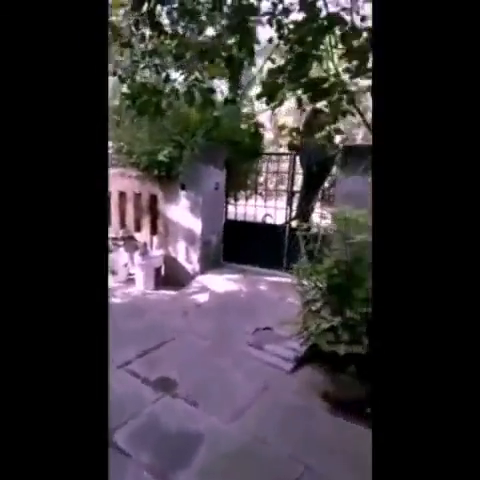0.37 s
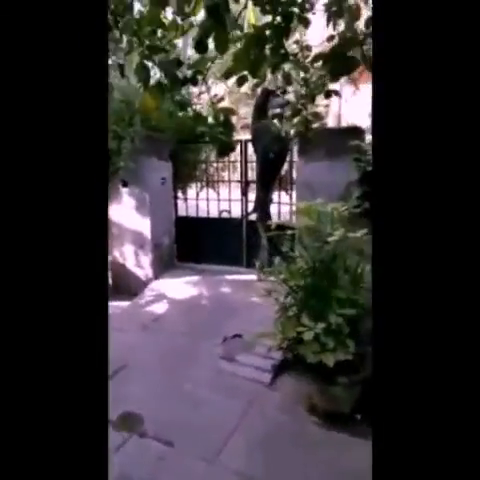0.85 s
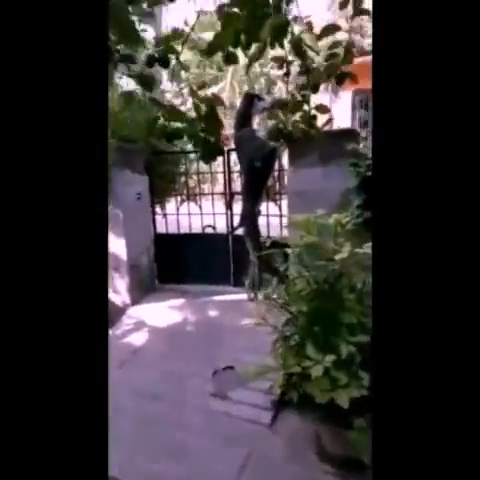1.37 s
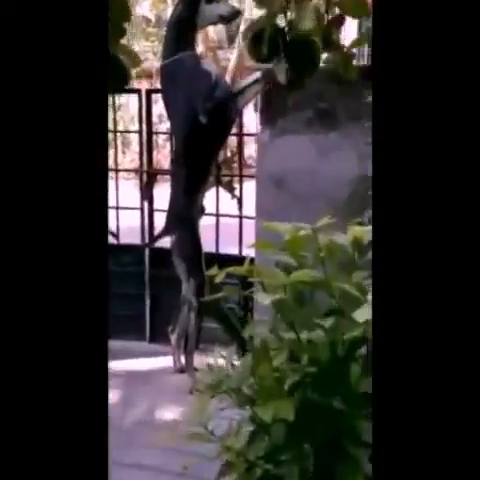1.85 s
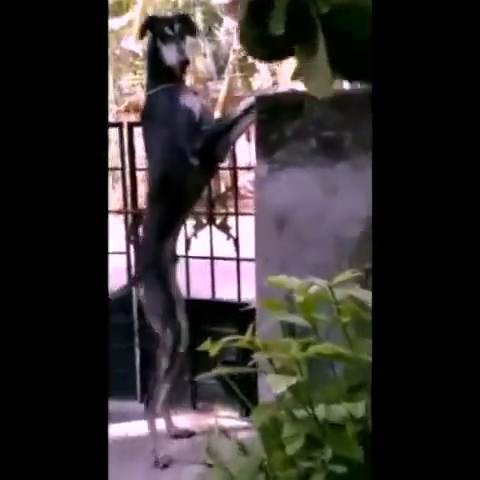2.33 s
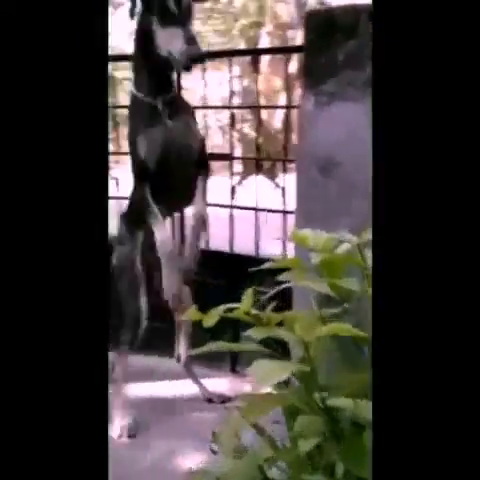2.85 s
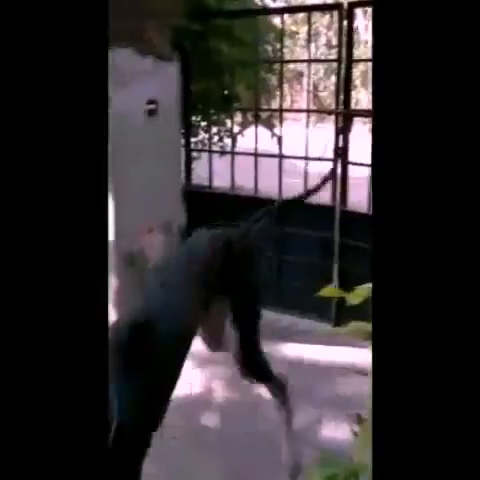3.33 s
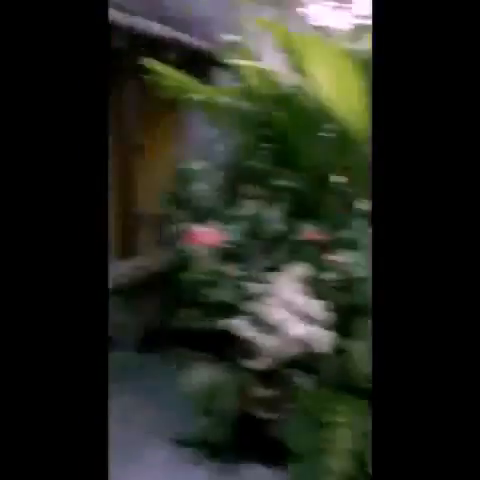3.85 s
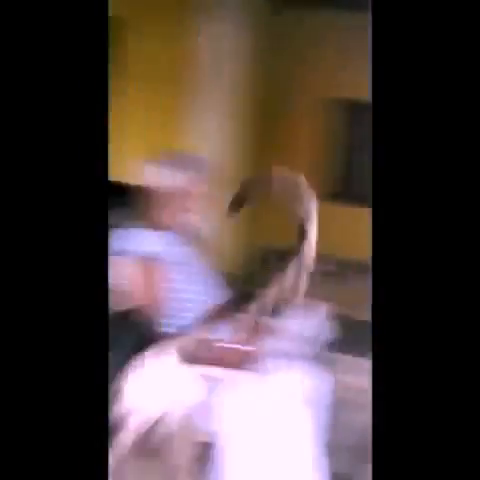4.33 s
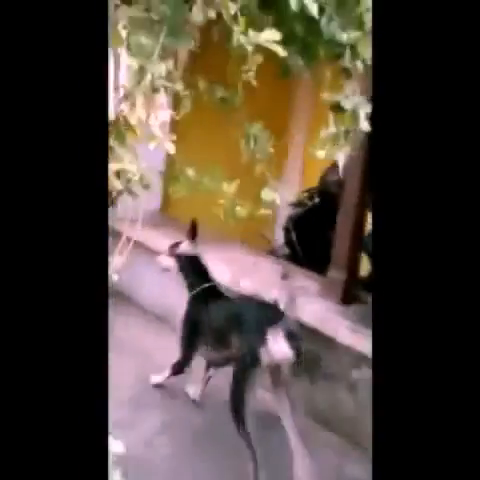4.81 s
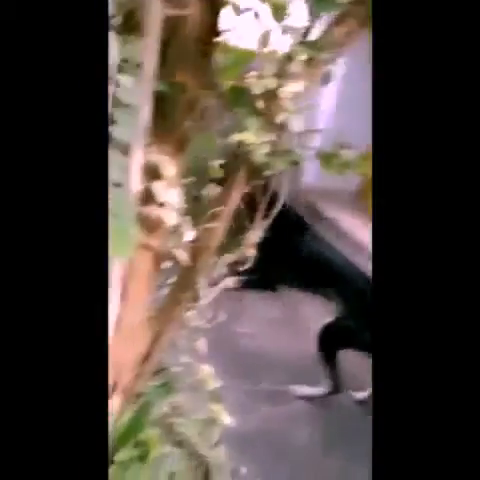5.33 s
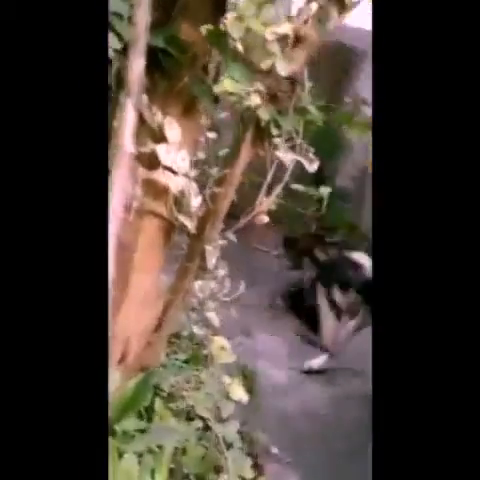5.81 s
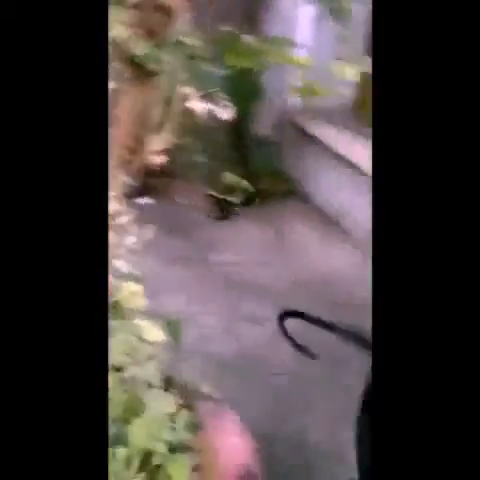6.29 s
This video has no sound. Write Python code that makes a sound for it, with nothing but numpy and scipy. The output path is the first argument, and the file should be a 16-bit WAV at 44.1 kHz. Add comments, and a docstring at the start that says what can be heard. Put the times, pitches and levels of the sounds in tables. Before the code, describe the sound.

In a leafy walled garden, a small bird whistles downward, crows caw, then a dog scampers past with jingling collar bell and scuffing paws.

```python
"""A walled garden in open air, with a low vehicle rumble beyond the wall that comes and goes.
A dog runs round a walking phone: claws tick, paws and soles scuff in grainy noise. A small bird near by
slides its whistle down four times, far birds peep in short near-sine notes, and crows caw three times in
rasping pulses; the collar bell jingles in ringing modes from just before the last caw.
The phone's noise suppressor turns quiet moments down throughout."""
import sys
import numpy as np
from scipy import signal
from scipy.fft import rfft, irfft
from scipy.io import wavfile
from scipy.ndimage import uniform_filter1d

SR = 44100
rng = np.random.default_rng(int(sys.argv[2]) if len(sys.argv) > 2 else 0)


def nominal_scale(level):
    """Amplitude ratio for a level in decibels (scalar or array-like)."""
    x = np.asarray(level, float) / 20
    return 10 ** x


def waveform_to_disk(signal):
    """Save audio, clipped to [-1, 1], as 16-bit WAV at the path in sys.argv[1]."""
    frames = np.transpose(np.atleast_2d(signal))
    scaled = np.clip(frames, -1, 1) * 32767
    samples = np.round(scaled).astype(np.int16)
    wavfile.write(sys.argv[1], SR, samples)


N = 294147

# the two microphone ports:
# (frequency [Hz], likeness [0-1], phase lead of the left [rad], left-right level of the air [dB])
PORTS = [(60, 0.4, 0.5, -22), (200, 0.77, 0, 8.5), (682, 0.85, 0.65, -3.5), (1068, 0.76, -2.5, 1),
         (3596, 0.68, -2.5, -0.5), (6140, 0.17, -0.05, 0), (11800, 0, -2, 18)]
# left-right level of the feet; scuffs scale it by frequency: (time [s], left-right level [dB])
FEET_SIDE = [(0.0, 13), (0.2, 35), (0.59, 16), (1.36, 1), (1.65, 25), (1.74, -12), (3.44, 4), (3.9, 29.5),
             (3.98, 8), (4.46, 27), (4.89, 6), (5.94, 4.5), (6.08, 26.5), (6.3, 6), (6.67, 15)]


def evened(x):
    """Scales a sound until its channel mean has rms 1."""
    return x / np.sqrt(np.mean(np.atleast_2d(x).mean(0) ** 2) + 1e-20)


def read(points, hz, axis=1):
    """Reads one column of a table over log frequency."""
    table = np.transpose(points)
    return np.interp(np.log(hz + 1), np.log(table[0] + 1), table[axis])


def add(mix, s, sound, pan_db=0):
    """Mixes a sound in at a time, panned by a left-right level difference."""
    part = mix[:, round(s * SR):][:, :np.shape(sound)[-1]]
    sides = nominal_scale(np.array([[.5], [-.5]]) * pan_db)
    part += np.atleast_2d(sound)[:, :part.shape[1]] * sides


def wobble(count, smooth_s):
    """Slow random drift of rms 1: white noise averaged twice."""
    width = int(smooth_s * SR)
    once = uniform_filter1d(rng.standard_normal(count), width)
    return evened(uniform_filter1d(once, width))


def patches(frames, bins_wide, frames_long):
    """Random cloud of deviation 1 over frequency and time, smoothed into patches."""
    cloud = rng.standard_normal((frames, 257)).T
    cloud = uniform_filter1d(uniform_filter1d(cloud, bins_wide, 0), frames_long, 1)
    return cloud / cloud.std()


def ports(x):
    """The right port hears a sound with its own phase at each frequency."""
    hz = np.fft.rfftfreq(x.shape[1], 1 / SR)
    turned = rfft(x[1]) * np.exp(-1j * read(PORTS, hz, axis=2))
    return np.array([x[0], irfft(turned, x.shape[1])])


def echoed(x, direct_db, rise_s, t60, shared):
    """Walls and leaves scatter a sound into a dense swarm of echoes; loudness is kept."""
    t = np.arange(SR // 2) / SR
    swarm = rng.standard_normal((3, len(t))) * (rng.random((3, len(t))) < .06)
    common, *own = swarm
    tail = (shared * common + np.array(own)) * (1 - np.exp(-t / rise_s)) * nominal_scale(-60 * t / t60)
    tail /= np.linalg.norm(tail[0])
    tail[:, 0] = nominal_scale(direct_db)  # the direct sound, against a swarm of unit energy
    wet = ports(signal.fftconvolve(x, tail, axes=1)[:, :N])
    return evened(wet) * np.sqrt(np.mean(x.mean(0) ** 2))


def noise(field_db, alike, grains=1):
    """White noise, smooth or in grains, coloured over frequency and time and heard by both ports."""
    white = grains * rng.standard_normal((2, N + 512))
    left, other = signal.stft(white, nperseg=512, noverlap=384)[2][:, :, :field_db.shape[2]]
    hz = np.fft.rfftfreq(512, 1 / SR)[:, None]
    same = np.clip(alike * read(PORTS, hz), 0, 1)
    right = same * left + np.sqrt(1 - same ** 2) * other
    right = right * np.exp(-1j * read(PORTS, hz, axis=2))
    coloured = np.array([left, right]) * nominal_scale(field_db)
    return signal.istft(coloured, nperseg=512, noverlap=384)[1][:, :N]


def whistle(rows, flutter):
    """A near sine follows rows of (time [s], rms level [dB], pitch [Hz]), its pitch fluttering."""
    s, db, hz = np.transpose(rows)
    t = np.arange(s[0], s[-1], 1 / SR)
    pitch = np.interp(t, s, hz) * (1 + flutter * wobble(len(t), 0.00064))
    tone = np.sin(2 * np.pi * np.cumsum(pitch) / SR)
    level = np.sqrt(2) * nominal_scale(np.interp(t, s, db))
    return level * tone * signal.windows.tukey(len(t), .15)


def air():
    """An open-air wash, broken into narrow patches as by a noise suppressor, over a low noise rumble."""
    # far traffic, leaves, insects: (frequency [Hz], relative density [dB per Hz])
    air_colour = [(59, -29), (100, -9.5), (524, -17), (621, -13.5), (722, -27), (808, -12.5), (1130, -22.5),
                  (1480, -17.5), (3710, -24.5), (7320, -22.5), (9000, -45.5), (11700, -47), (19800, -120)]
    # the wash: (time [s], rms level [dB])
    wash_level = [(0, -56), (2, -56), (4.7, -54), (6.67, -53.5)]
    # a vehicle beyond the wall: (time [s], rms level [dB])
    rumble_level = [(0.0, -80.5), (0.72, -89), (2.01, -120), (2.17, -56), (3.07, -55.5), (3.49, -48.5),
                    (3.92, -65), (5.61, -58), (5.74, -55.5), (5.94, -76), (6.39, -56), (6.67, -69)]
    hz = np.fft.rfftfreq(512, 1 / SR)
    field_db = read(air_colour, hz)[:, None] + 3.8 * patches(N // 128 + 5, 2, 14)
    side_db = read(PORTS, hz, axis=3)[:, None]
    wash = noise(field_db + np.array([.5, -.5])[:, None, None] * side_db, 0.77)

    common, *own = rng.standard_normal((3, N))
    low_band = signal.butter(2, [85, 160], "bandpass", fs=SR, output="sos")
    rumble = signal.sosfilt(low_band, common + 0.59 * np.array(own))

    t = np.arange(N) / SR
    wash_gain = nominal_scale(np.interp(t, *np.transpose(wash_level)))
    rumble_gain = nominal_scale(np.interp(t, *np.transpose(rumble_level)))
    return wash_gain * evened(wash) + rumble_gain * evened(rumble)


def claws():
    """Each tick is a crack of noise ringing in a wide, short resonance."""
    # claw ticks: (time [s], relative level [dB], ring frequency [Hz])
    ticks = [(0.0906, -28, 6300), (.125, -30, 6500), (.377, -39.5, 8840), (3.7, -11.5, 6800),
             (3.8863, -19.5, 7000), (3.999, -15, 5600), (4.1393, -19, 5750), (4.3264, -20, 6300),
             (4.4467, -24, 4970), (4.5037, -14.5, 5300), (4.5458, -23, 5000), (5.0417, -10, 7500),
             (6.11, -21.5, 5700), (6.3247, -12.5, 6600), (6.473, -15.5, 6960)]
    out, t = np.zeros((2, N)), np.arange(SR // 40) / SR
    cracks = rng.standard_normal((len(ticks), len(t)))
    for (s, db, hz), crack in zip(ticks, cracks):
        band = signal.iirpeak(hz, 1.6, SR)
        ring = signal.lfilter(*band, signal.lfilter(*band, crack))
        envelope = nominal_scale(db - 60 * t / 0.021) * (1 - np.exp(-t / 0.0013))
        side_db = np.interp(s, *np.transpose(FEET_SIDE))
        add(out, s, envelope * evened(ring) / 3, side_db)
    return ports(out)


def scuffs():
    """Gritty friction: noise broken into grains, brighter or heavier with each stroke."""
    # strokes of paws and soles: (time of the peak [s], relative drag level [dB], time to fall 20 dB [s],
    # grit at 10.5 kHz [dB], weight below 2 kHz [dB])
    strokes = [(0.137, -51, 0.053, -13.5, -17), (.29, -62, 0.23, -25.5, 0), (.39, -68.5, 0.26, -12, -15),
               (.51, -59, .06, -15, -26.5), (1.329, -61.5, 0.21, -13, 17), (1.6, -54, 0.0577, -15.5, 0),
               (2.853, -57, 0.184, -13, 4), (3.266, -49.5, 0.082, -12, -29.5), (3.457, -36.5, 0.16, -6, 6),
               (3.56, -45.5, 0.19, -18, 18.5), (3.706, -45, 0.044, -4.5, 11),
               (3.772, -48, 0.085, -10.5, -12), (3.906, -44, 0.09, -13, -7), (3.959, -48.5, .14, -8.5, 12),
               (4.104, -36, 0.12, -6.5, -5), (4.162, -35, 0.047, -7.5, -6), (4.25, -51, .09, -13, 8.5),
               (4.337, -48.5, 0.11, -13, 0), (4.458, -45, 0.056, -12.5, -10.5),
               (4.512, -40.5, 0.059, -19, -1.5), (4.557, -42, 0.035, -19.5, -9),
               (4.667, -52, 0.13, -16, 13), (4.738, -53, 0.1223, -15, 20), (4.804, -51.5, 0.19, -8, 9.5),
               (5.052, -40.5, 0.086, -2.5, 0.5), (5.194, -47.5, 0.084, -2.5, 2),
               (5.337, -38.5, 0.12, -5, 1), (5.522, -54, 0.37, -14, 9), (5.719, -57, 0.079, -8, 4),
               (5.9, -53, 0.34, -17.5, 5.5), (6.125, -43, 0.093, -19, 1), (6.255, -58, 0.17, -12.5, 11),
               (6.333, -40.5, 0.04, -11, -1.5), (6.397, -46, 0.072, -10.5, 6), (6.487, -43.5, .085, -6, -4),
               (6.598, -48.5, 0.028, -10.5, -1), (6.645, -40.5, 0.05, -10.5, -11)]
    # friction on paving: (frequency [Hz], relative density [dB per Hz])
    scuff_colour = [(300, -27.5), (1000, -20.5), (2700, -12), (3100, -16), (3600, -20.5), (4300, -7),
                    (7400, -4.5), (8600, -12.5), (12000, -16), (14000, -23.5), (15200, -13)]
    rise_share = 0.62  # rise time as a share of the fall time
    grit_narrowing = 0.38  # the grit comes and goes faster than the body of a stroke
    t = np.arange(N // 128 + 5) * 128 / SR
    hz = np.fft.rfftfreq(512, 1 / SR)[:, None]
    high = np.clip((hz - 7000) / 3500, 0, 1.8)
    low = np.clip((3300 - hz) / 1300, 0, 1)

    power = 1e-16
    for s, db, fall_s, grit_db, weight_db in strokes:
        rise = ((s - t) / (rise_share * fall_s)) ** 2
        # the unused side of the peak is held at zero
        fall = (np.maximum(t - s, 0) / fall_s) ** 1.32
        stroke_db = db - 20 * np.where(t < s, rise, fall)
        treble_db = high * (grit_db + grit_narrowing * (stroke_db - db))
        power = power + nominal_scale(2 * (stroke_db + treble_db + low * weight_db))  # doubled dB give power

    # the right port hears less treble, so the side difference grows with frequency
    side_db = np.interp(t, *np.transpose(FEET_SIDE)) * (0.32 + 1.135 * high)
    colour_db = read(scuff_colour, hz) - read(scuff_colour, 5160)
    field_db = 10 * np.log10(power) + colour_db + 3.14 * patches(len(t), 12, 6)
    field_db = field_db + np.array([.5, -.5])[:, None, None] * side_db

    # about 900 grains a second, of uneven strength
    strength = nominal_scale(2.5 * np.minimum(rng.exponential(1, N + 512), 4))
    grains = uniform_filter1d(strength * (rng.random(N + 512) < 900 / SR), 40)
    return nominal_scale(14.5) * noise(field_db, 0.61, evened(0.21 + grains))


def slides():
    """A small bird's near-sine whistle glides down one tune four times; its echoes trail above the fall."""
    # falling whistles: (start [s], level [dB], stretch of the tune [ratio], left-right level [dB])
    songs = [(0.713, -27, 0.87, 3.5), (2.058, -28.5, 1.14, 1), (3.992, -26, 1.2, 1), (5.62, -25, 1.01, 1)]
    # one tune: (time before the stretch [s], pitch [Hz], relative level [dB])
    tune = [(0, 8400, -2), (0.018, 7415, -1), (0.061, 6410, 1.5), (0.104, 5321, -2.5), (.125, 5300, -18),
            (.17, 5350, -45)]
    out = np.zeros((2, N))
    for s, db, stretch, pan_db in songs:
        rows = [(stretch * u, db + note_db, hz) for u, hz, note_db in tune]
        add(out, s, whistle(rows, 0.0053), pan_db)
    return echoed(out, -25.0, 0.018, 0.22, 0.55)


def peeps():
    """Short near-sine notes swell and fade, roughened by the long way through the leaves."""
    # notes of far birds: (start [s], length [s], first pitch [Hz], last pitch [Hz], loudest level [dB])
    notes = [(1.037, 0.21, 7740, 6660, -63), (1.242, .2, 2690, 2646, -55), (1.794, 0.065, 4500, 4050, -55),
             (1.819, .14, 2473, 2424, -55), (1.995, 0.061, 7480, 8240, -53.5),
             (2.794, 0.15, 2473, 2236, -52), (3.849, 0.06, 2430, 2460, -51),
             (4.041, 0.191, 2448, 2497, -43.5), (4.679, 0.14, 2768, 2684, -40.5),
             (4.965, 0.127, 2368, 2336, -45.5), (5.214, 0.15, 2706, 2714, -38),
             (5.336, .13, 2430, 2318, -47), (5.6, 0.099, 2980, 2880, -52.5),
             (5.751, 0.091, 2647, 2633, -31), (5.766, 0.076, 2372, 2357, -36.5),
             (5.875, 0.022, 3690, 3190, -41), (6.052, 0.13, 3070, 3000, -49.5),
             (6.24, 0.12, 2694, 2630, -43)]
    loudest = .55  # place of the loudest moment, as a share of the length
    arch = 1.015  # pitch lifts a little with the effort
    out = np.zeros((2, N))
    for s, length, first_hz, last_hz, db in notes:
        middle_hz = arch * (first_hz + loudest * (last_hz - first_hz))
        rows = [(0, db - 8, first_hz), (loudest * length, db, middle_hz), (length, db - 9, last_hz)]
        add(out, s, whistle(rows, .016))
    return echoed(out, 0, .004, .1, .7)


def crows():
    """Unsteady pulses, rasping in bursts, pass the throat; each caw has its own dullness."""
    # caws: (start [s], length [s], effort [dB], top pitch [Hz],
    # fall of the overtones above 1.9 kHz [dB per kHz, negative is duller])
    caws = [(1.199, 0.56, -64, 470.4, 0), (2.234, .29, -39.5, 517, -36), (3.347, .39, -31, 545.6, -0.6)]
    # resonances of the throat: (frequency [Hz], relative level [dB])
    throat = [(550, -36), (850, -11), (1050, -9), (1250, -11), (1520, 1), (2050, -2), (2650, -9),
              (3000, -36), (4150, -16), (4700, -20), (5400, -40)]
    top, scoop, sag, bend = .22, .11, .21, 1.3  # pitch scoops up to its top (share of the length), then sags
    hold, drop = 0.59, .09  # shares of the length: the breath holds, then drops quickly to a weak tail
    out = np.zeros((2, N))
    for s, length, db, top_hz, dull_db in caws:
        t = np.arange(0, length, 1 / SR)
        share = t / length
        early = np.maximum(1 - share / top, 0)
        late = np.maximum(share - top, 0) / (1 - top)
        pitch = top_hz * (1 - scoop * early - sag * late ** bend)
        effort_db = db + np.interp(share, [0, hold, hold + drop, 1], [0, 2, -11, -24.5])

        turns = np.cumsum(pitch * (1 + .024 * wobble(len(t), .002))) / SR
        pulses = sum(np.cos(2 * np.pi * k * turns) for k in range(1, 11))
        # every fifth pulse is stronger
        rasp = 1 + .55 * np.cos(2 * np.pi * turns / 5) + .25 * wobble(len(t), .001)

        hz = np.fft.rfftfreq(len(t), 1 / SR)
        colour_db = read(throat, hz) + dull_db * np.maximum(hz - 1900, 0) / 1000
        voiced = irfft(rfft(pulses * rasp) * nominal_scale(colour_db), len(t))
        attack = np.minimum(t / 0.028, 1)
        add(out, s, nominal_scale(effort_db) * attack * evened(voiced) * signal.windows.tukey(len(t), .06))
    return echoed(out, -8.5, 0.0023, 0.28, 1.2)


def bell():
    """The pea strikes the shell and rebounds twice, weaker; the close pair of modes beats."""
    # bell strikes: (time [s], relative level [dB])
    jingles = [(3.1571, -19), (3.2314, -33.5), (3.252, -11), (3.2774, -26), (3.4969, -17.5),
               (3.7642, -11.5), (3.9201, -11.5), (3.934, -4), (3.9779, -12.5), (3.9981, -22.5),
               (4.0362, -15), (4.0672, -17), (4.2906, -33.5), (4.328, -21.5), (4.597, -28.5), (4.9703, -32),
               (5.248, -33.5), (5.3328, -26.5), (5.398, -31), (5.9978, -40), (6.021, -33), (6.3948, -20.5),
               (6.6184, -47), (6.6338, -9)]
    # modes of the shell: (frequency [Hz], relative level [dB], time to fall 60 dB [s])
    modes = [(6546, 0, .09), (6612, -2, .09), (5500, -15, .018), (6050, -14, .012), (7200, -17, .012),
             (8690, -40, .1)]
    # where the collar is: (time [s], left-right level [dB])
    collar_side = [(3.1, 1), (3.9, 6), (4.4, 14), (5.3, -18), (6.3, -13), (6.6, 3.5)]
    out, t = np.zeros((2, N)), np.arange(SR // 4) / SR
    draws = rng.random((len(jingles), 3, 7))  # six mode phases and one timing for each contact
    for (s, db), draw in zip(jingles, draws):
        side_db = np.interp(s, *np.transpose(collar_side))
        for k, chance in enumerate(draw):
            ring = 0
            for (hz, mode_db, t60), phase in zip(modes, chance):
                ring = ring + nominal_scale(mode_db - 60 * t / t60) * np.sin(2 * np.pi * (hz * t + phase))
            delay_s = k * (0.0073 + 0.029 * chance[-1])
            onset = 1 - np.exp(-t / 0.000467)
            add(out, s + delay_s, nominal_scale(db - 6.5 - 15.0 * k) * onset * ring, side_db)
    return echoed(out, 0.8, 0.0014, 0.13, 0.46)


def scene():
    """Sums the garden air, the dog and soles, the birds and the bell."""
    return air() + claws() + scuffs() + slides() + peeps() + crows() + bell()


def top_cut(x):
    """Nothing passes above the cut-off."""
    return signal.sosfilt(signal.butter(12, 15280, fs=SR, output="sos"), x)


def record(dry):
    """The microphone band; then the suppressor opens when the sound is loud and shuts when it is quiet."""
    low_cut = signal.butter(4, 90, "highpass", fs=SR, output="sos")
    high_cut = signal.cheby2(10, 60, 15400, fs=SR, output="sos")
    heard = signal.sosfilt(high_cut, signal.sosfilt(low_cut, dry))
    power = uniform_filter1d((heard ** 2).mean(0), 2600)
    power_db = 10 * np.log10(abs(power) + 1e-12)
    # 0.38 dB down for each dB below -23.5 dB, at most 12 dB
    shut_db = np.clip(0.38 * (power_db + 23.5), -12, 0)
    finished = heard * nominal_scale(uniform_filter1d(shut_db, 900))
    return top_cut(finished)


dry = scene()
out = record(dry)
waveform_to_disk(out)
```